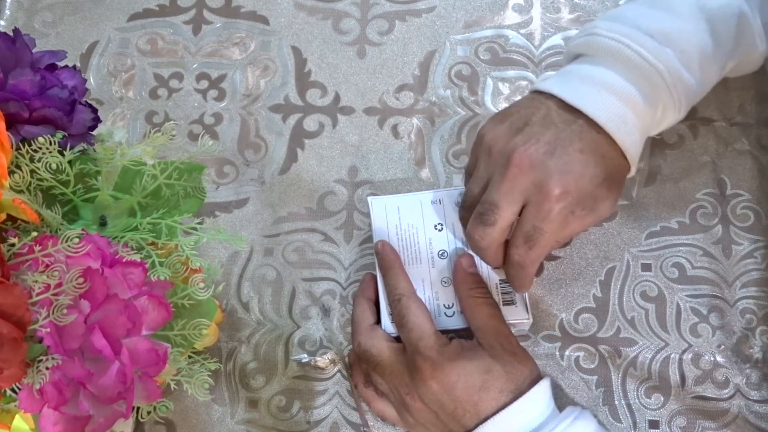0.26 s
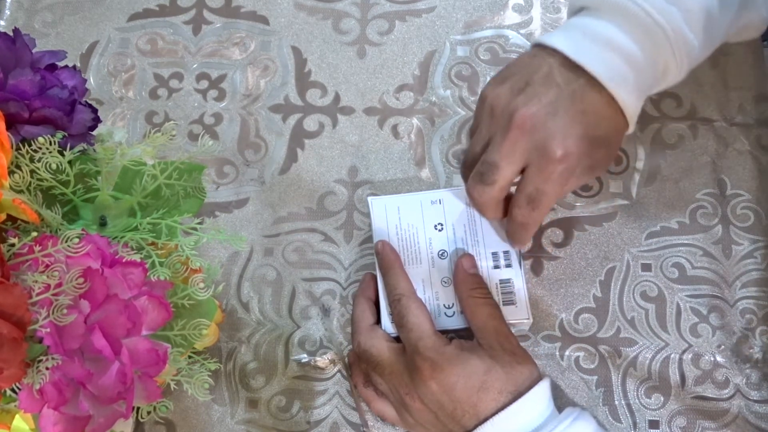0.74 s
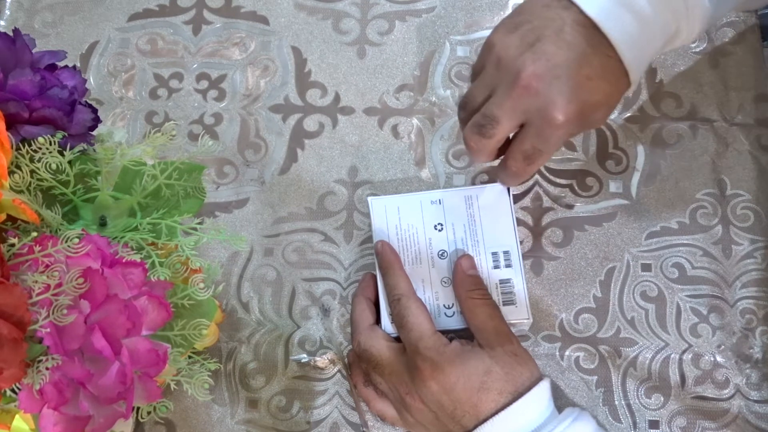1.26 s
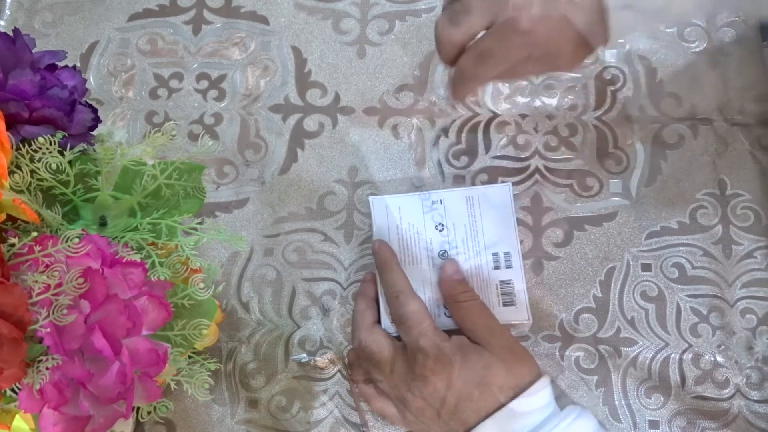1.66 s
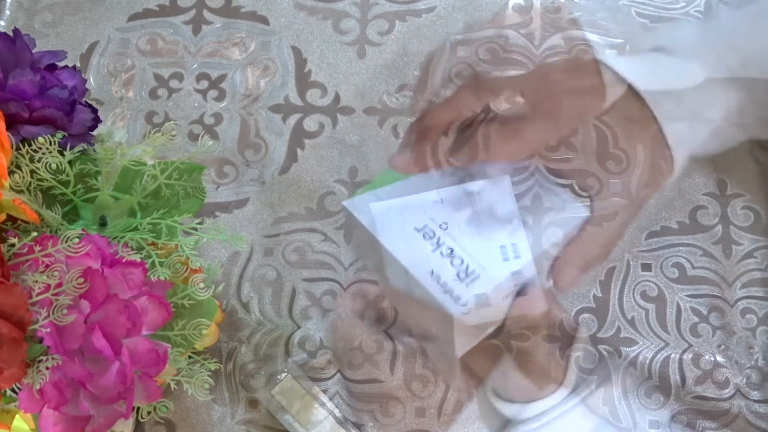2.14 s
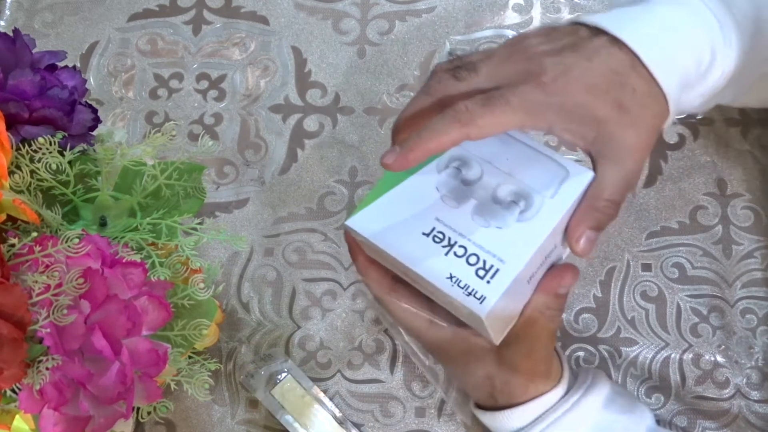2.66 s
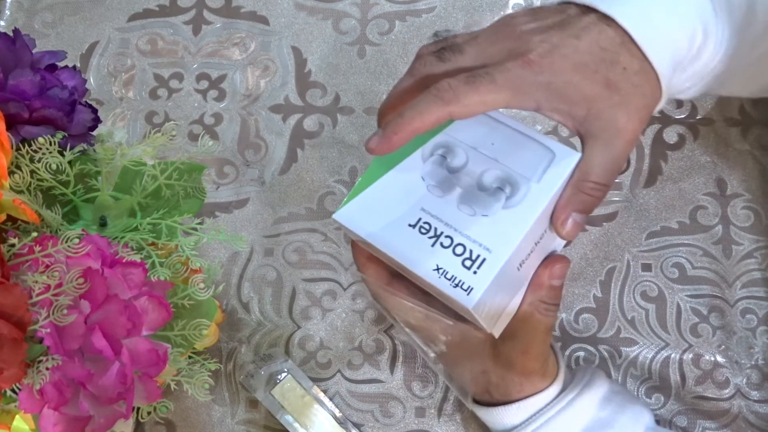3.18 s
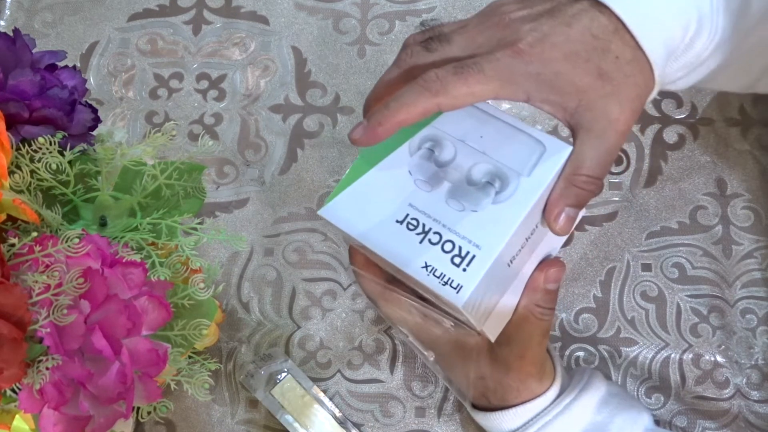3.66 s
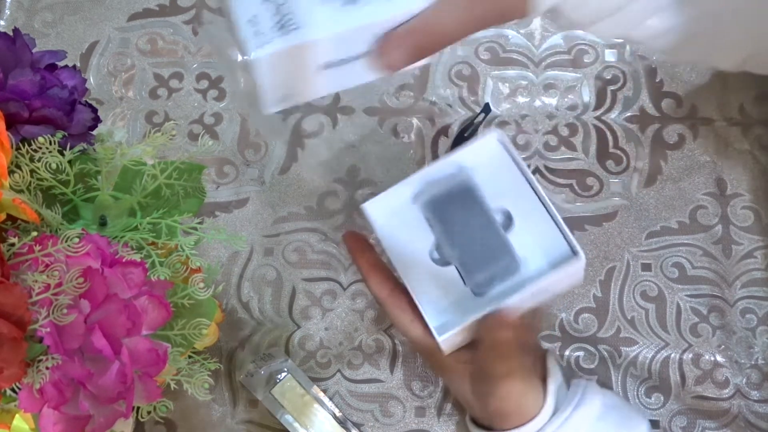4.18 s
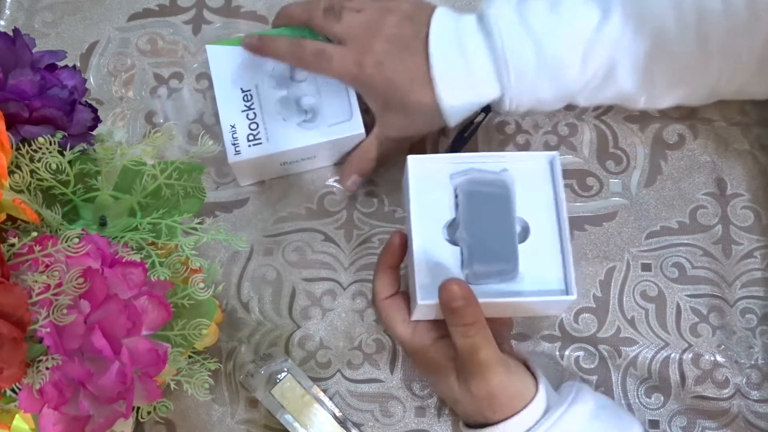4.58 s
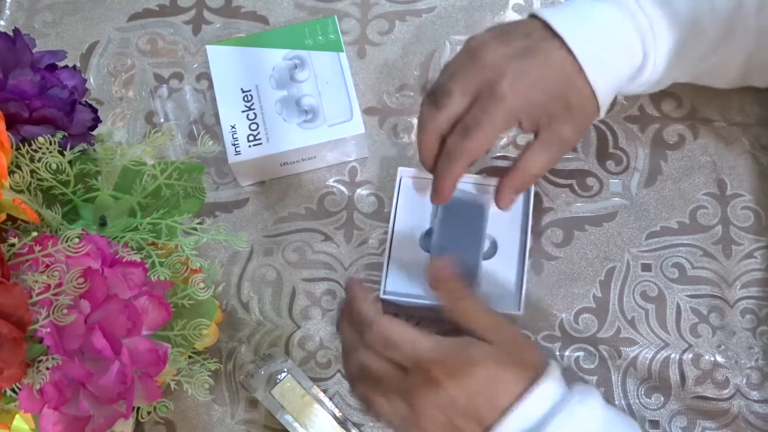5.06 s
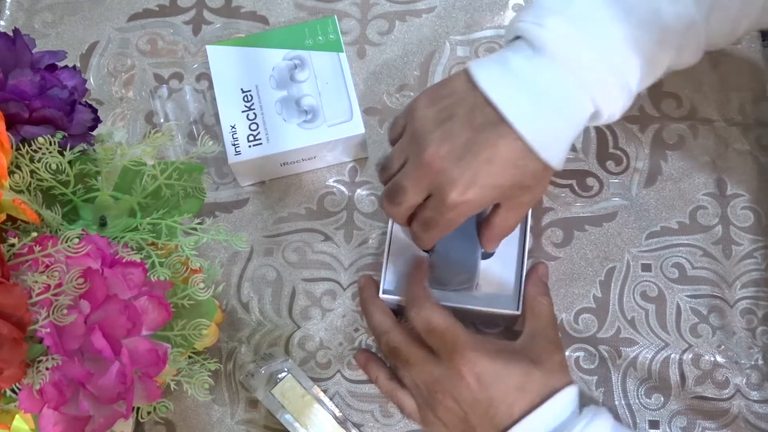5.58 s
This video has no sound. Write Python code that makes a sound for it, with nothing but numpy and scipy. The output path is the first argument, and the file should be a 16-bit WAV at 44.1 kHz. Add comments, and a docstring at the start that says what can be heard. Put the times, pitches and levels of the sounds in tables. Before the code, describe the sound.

Hands unwrap a small cardboard box with crisp plastic snaps, slide its lid free with a soft scrape and knock it against a table.

```python
"""Unpacking a small cardboard box.

Hands work at a plastic-covered table in a bare, ringing room. Sealing film ticks and rustles.
The tight lid sticks and slips upward, then pops free with a puff of air. The lid is dropped
and the tray knocked down; the table rings. A small motor throbs faintly in the background."""
import sys
import numpy as np
from scipy import signal
from scipy.fft import rfft, irfft
from scipy.io import wavfile

SR = 44100
rng = np.random.default_rng(int(sys.argv[2]) if len(sys.argv) > 2 else 0)


def store_wav(level_fs):
    """Save 16-bit WAV to argv[1]."""
    pcm = np.round(np.clip(np.atleast_2d(level_fs), -1, 1) * 32767)
    wavfile.write(sys.argv[1], SR, pcm.T.astype(np.int16))


N = 256662
TIME_S = np.arange(N) / SR
TOP_HZ = 11100

# Spectra of still air and of each contact. Each row: frequency in Hz, relative level in dB.
AIR_SPECTRUM = [(25, 4), (90, -5.5), (250, -6), (600, 0.5), (1100, -2.5), (1900, -9), (3200, -13),
                (4500, -18), (6500, -21), (11000, -15)]
SNAP_SPECTRUM = [(200, -26), (1500, -42), (3000, -37), (5500, -9), (8200, 0), (9500, -3.5), (11000, -8)]
CARD_SPECTRUM = [(100, -26), (500, -7), (1000, 4), (2000, 1), (3500, 2.5), (5000, 1.5), (11000, -17)]
HOLLOW_SPECTRUM = [(60, -35), (200, -20), (350, -13), (520, 3), (720, 0.5), (1050, -9), (1350, -12),
                   (2000, -10), (6000, -44)]
FILM_SPECTRUM = [(25, -21), (110, -12.5), (250, -8.5), (800, -3.5), (2500, -3), (5000, -1), (7600, 2.5),
                 (11000, -5.5)]
KNOCK_SPECTRUM = [(25, -55), (60, -47), (100, -23), (170, -23), (300, -6.5), (560, 0.5), (900, 3.5),
                  (1400, -3), (2100, -5.5), (2600, -12), (5500, -20), (7500, -24), (11000, -34.5)]
PAPER_SPECTRUM = [(30, -29), (500, -12), (1900, 3.5), (2500, -1), (3100, 4.5), (3800, -4), (5000, -4.5),
                  (8000, 1.5), (11000, -10.5)]
# Resonances of motor housing, whole box and lid walls. Each row: centre in Hz, width in Hz, gain in dB.
HOUSING_MODES = [(454, 185, 2.5), (622, 54, -3), (947, 41, 3), (1397, 230, 0.5), (2197, 120, -1),
                 (2590, 110, -15.5)]
BOX_MODES = [(229, 50, -2.5), (313, 163, 2.5)]
WALL_MODES = [(372, 176, 11), (815, 155, 7.5), (1010, 64, -34), (1420, 76, -0.5), (1830, 140, 1),
              (3020, 110, -2.5)]
# Film and nails catch on the box. Each row: start in seconds, film snap in dB, card click in dB,
# hollow thud in dB, panel resonance in Hz.
CATCHES = [(0.586, -20.5, -19.5, -47, 3400), (0.799, -14.5, -13, -10, 3020), (1.612, -6.5, -20, -20, 1310),
           (1.621, -10, -23, -35, 1230), (1.749, -5, -17, -20.5, 1260), (1.7667, -6, -23.5, -45, 4380),
           (1.810, -3, -21, -44, 3740), (2.014, -14, -30, -45, 4700), (2.027, -11, -26, -41, 5500),
           (2.0488, -4.5, -23, -46, 4730), (2.1813, -15, -16, -46, 1900), (2.184, -9, -13, -68, 4850),
           (2.239, -11.5, -26, -47, 4760), (2.258, -9.5, -18.5, -58, 2250), (3.749, -16.5, -20, -30, 1900),
           (4.094, -38, -39, -48, 3200), (4.268, -24.5, -37, -38, 4370), (4.2935, -16, -34, -56, 4470),
           (5.368, -29, -20, -28, 3230), (5.572, -35, -23, -37, 3300), (5.5994, -13, -20, -24, 3660)]
# Fingers or lid brush film and card. Each row: start, length and swell time in seconds, level in dB.
BRUSH_STROKES = [(.96, 0.22, 0.065, -61.5), (1.43, 0.057, 0.088, -60), (1.61, 0.13, 0.02, -54.5),
                 (1.77, 0.13, .03, -51), (1.95, .015, 0.027, -46.5), (2.06, .18, 0.028, -51),
                 (2.38, 0.016, 0.017, -65), (3.86, 0.049, .02, -58.5), (3.98, 0.34, .03, -66.5),
                 (4.33, 0.14, .02, -57.5), (4.497, 0.012, 0.0078, -34.5), (5.29, 0.038, 0.028, -48.5),
                 (5.45, .05, 0.036, -49), (5.62, 0.034, 0.034, -46.5)]
# The box is bumped, pops open or lands. Each row: start in seconds, energy in dB, bass gain in dB,
# hard-edge gain in dB, panel resonance in Hz, room send in dB.
BOX_KNOCKS = [(1.475, -23.5, 20.5, 1, 450, 2.5), (1.824, -20.5, 10, 17, 1300, 5.5),
              (3.75, -13, 1, 14, 940, -19), (4.477, 5.5, 6, 1, 1394, 8),
              (4.4934, -5.5, -4, 1.5, 1940, 11.5), (4.504, 8, 0.5, -3, 880, -8.5),
              (4.524, 6, 2.5, 0, 565, 1), (4.547, 8, 4.5, -21, 1440, 2), (4.847, 11, -6.5, 5, 1387, 1),
              (5.018, 8.5, 5, 4, 3720, 1.5), (5.0406, 10.5, 13, 12, 1800, -8),
              (5.0772, 4, 13, 20, 2470, -5)]
# Table resonances. Each row: frequency in Hz, relative energy in dB, 60 dB decay time in seconds.
TABLE_MODES = [(225, -11.5, 0.67), (327, -8, 0.76), (413, -13, 0.63), (570.6, -9.5, 0.28), (769, -8, 0.32),
               (859.5, -12.5, 0.35), (890, -19, 0.86), (1140, -8, 0.25), (1394, -14.5, 0.57),
               (1747, -19, 0.56), (1910, -12.5, 0.32), (2080, -24, .65)]
# Pulls on the lid; the last frees it. Each row: start and length in seconds, groan in dB, rub in dB.
LID_PULLS = [(2.735, 0.293, -53.5, -56), (3.108, 0.57, -53.5, -50.5), (3.742, 0.017, -51.5, -40.5)]
# The lid glides ahead. Each row: start, length and swell time in seconds, hiss level in dB.
LID_GLIDES = [(2.92, 0.033, 0.042, -48.5), (3.115, 0.049, 0.02, -49), (3.32, 0.084, 0.033, -49.5),
              (3.73, .04, 0.032, -48.5)]
# Reverberation. Each row: band centre in Hz, 60 dB decay time in seconds, level in dB,
# side relative to mid in dB.
ROOM_BANDS = [(100, 1.0, 3.5, -12.5), (300, 0.9, 3, -20), (714, 1, 3, -14), (1860, 1, -0.5, -9.5),
              (4650, 0.86, 0.5, -11), (10400, 0.69, -1, -9)]


def amp(db):
    """Decibels to gain."""
    return 10 ** (np.asarray(db) / 20)


def unit_rms(x):
    """Scale to rms 1."""
    return x / np.sqrt(np.mean(x ** 2))


def unit_energy(x):
    """Scale to energy 1."""
    return x / np.sqrt(np.sum(x ** 2))


def log_interp(hz, points_hz, values):
    """Interpolate on a log-frequency axis."""
    return np.interp(np.log(hz + 1), np.log(points_hz), values)


def response(spectrum, panel_hz=1000, panel_db=0, size=2048):
    """Minimum-phase impulse response of a spectrum, raised at one panel resonance; energy 1."""
    hz = np.fft.rfftfreq(size, 1 / SR)
    peak_db = panel_db / (1 + ((hz / panel_hz - 1) / 0.088) ** 2)
    cepstrum = irfft(np.log(amp(log_interp(hz, *np.transpose(spectrum)) + peak_db)))
    cepstrum[1:size // 2] *= 2
    cepstrum[size // 2 + 1:] = 0
    return unit_energy(irfft(np.exp(rfft(cepstrum))))


def convolve(x, impulse):
    """Convolve, keeping the length."""
    return signal.fftconvolve(x, impulse)[:len(x)]


def resonate(x, modes):
    """Parallel resonators."""
    return sum(amp(db) * signal.lfilter(*signal.iirpeak(hz, hz / width_hz, fs=SR), x)
               for hz, width_hz, db in modes)


def add(track, start_s, x):
    """Mix x into the track."""
    i = int(start_s * SR)
    track[i:i + len(x)] += x[:N - i]


def wander(rate_hz):
    """Random drift, spread near 1."""
    knots = rng.standard_normal(int(N / SR * rate_hz) + 2)
    return np.interp(TIME_S * rate_hz, np.arange(len(knots)), knots)


def grains(rate_hz, spread_db):
    """Dense tiny catches of uneven size."""
    impulses = (rng.random(N) < rate_hz / SR) * rng.standard_normal(N)
    return unit_rms(impulses * amp(spread_db * np.minimum(rng.exponential(size=N), 4)))


def disperse(x, linger_s, stages):
    """Bending waves scatter: all-pass stages delay some pitches, low ones most."""
    place = (np.arange(stages) + rng.random(stages)) / stages
    poles = np.exp(2j * np.pi * TOP_HZ * place ** 2 / SR - (0.5 + place) / (linger_s * SR))
    denominator = np.column_stack([np.ones(stages), -2 * poles.real, np.abs(poles) ** 2])
    return signal.sosfilt(np.hstack([denominator[:, ::-1], denominator]), x)


def stroke(start_s, length_s, attack_s, release_s):
    """Envelope of one hand movement: swells up to its start, holds, fades."""
    since_s = TIME_S - start_s
    return np.exp(np.minimum(since_s, 0) / attack_s - np.maximum(since_s - length_s, 0) / release_s)


def strokes(rows, release_s):
    """Envelope of several movements; powers add."""
    return np.sqrt(sum((amp(db) * stroke(start_s, length_s, swell_s, release_s)) ** 2
                       for start_s, length_s, swell_s, db in rows))


def stereo_noise(side_gain):
    """Partly correlated white noise, left and right."""
    mid, side = rng.standard_normal((2, N))
    return mid + side_gain * side, mid - side_gain * side


def still_air(level_db):
    """Steady, dull room noise."""
    air = response(AIR_SPECTRUM)
    return amp(level_db) * np.array([unit_rms(convolve(x, air)) for x in stereo_noise(0.95)])


def motor(whirr_db, throb_db):
    """The housing whirrs, and throbs once a turn."""
    turn_hz, tone_hz, sharpness, uneven_db = 25.1, 476, 2.2, 1.7
    whirr = np.array([resonate(resonate(x, HOUSING_MODES), HOUSING_MODES) for x in stereo_noise(0.83)])
    pulses = np.exp(sharpness * np.cos(2 * np.pi * turn_hz * (TIME_S - 0.037)))
    pulses *= amp(uneven_db * wander(turn_hz))
    tone = np.sin(2 * np.pi * tone_hz * TIME_S + 1.15 * wander(turn_hz))
    return amp(whirr_db) * unit_rms(whirr) + amp(throb_db) * unit_rms(pulses * tone)


def film_ticks():
    """Each catch snaps the film, clicks a card panel and thuds the air in the box."""
    out = np.zeros(N)
    snap, hollow = response(SNAP_SPECTRUM), response(HOLLOW_SPECTRUM)
    for start_s, snap_db, card_db, hollow_db, panel_hz in CATCHES:
        card = response(CARD_SPECTRUM, panel_hz, panel_db=10)
        add(out, start_s, amp(snap_db) * disperse(snap, linger_s=0.0004, stages=6))
        add(out, start_s, amp(card_db) * disperse(card, linger_s=0.0016, stages=10))
        add(out, start_s, amp(hollow_db) * disperse(hollow, linger_s=0.0018, stages=8))
    return out


def film_rustle():
    """Skin drags over film in a fine, uneven crackle."""
    pressure = strokes(BRUSH_STROKES, release_s=0.019) * amp(0.94 * wander(60))
    return pressure * convolve(grains(rate_hz=4000, spread_db=2), response(FILM_SPECTRUM))


def box_knocks():
    """Flat landings are bassy, corners hard. Returns direct sound and room send."""
    direct, send = np.zeros(N), np.zeros(N)
    hz, db = np.transpose(KNOCK_SPECTRUM)
    bass_shelf = log_interp(hz, [330, 650], [1, 0])
    edge_shelf = log_interp(hz, [1500, 3200], [0, 1])
    for start_s, energy_db, bass_db, edge_db, panel_hz, send_db in BOX_KNOCKS:
        spectrum = np.column_stack([hz, db + bass_db * bass_shelf + edge_db * edge_shelf])
        impact = response(spectrum, panel_hz, panel_db=9)
        hit = amp(energy_db) * disperse(impact, linger_s=0.0029, stages=14)
        add(direct, start_s, hit)
        add(send, start_s, hit * amp(send_db))
    return direct, send


def table_ring(knocks, gain_db):
    """The table top rings on after each knock."""
    t = TIME_S[:SR]
    ring = sum(amp(db) * unit_energy(np.sin(2 * np.pi * hz * t) * np.exp(-np.log(1000) * t / t60_s))
               for hz, db, t60_s in TABLE_MODES)
    return amp(gain_db) * convolve(knocks, ring)


def pull_gains():
    """In each pull the groan eases as the lid moves; the rub grows with speed."""
    groan_sag_db_per_s, rub_rise_db_per_s = 11, 1.5
    groan, rub = np.zeros(N), np.zeros(N)
    for start_s, length_s, groan_db, rub_db in LID_PULLS:
        force = stroke(start_s, length_s, attack_s=0.02, release_s=0.0096)
        elapsed_s = np.clip(TIME_S - start_s, 0, length_s)
        groan += force * amp(groan_db - groan_sag_db_per_s * elapsed_s)
        rub += force * amp(rub_db + rub_rise_db_per_s * elapsed_s)
    return groan, rub


def lid_slide(judder_db, paper_db):
    """The lid sticks and slips on the tray: the box groans, walls resound, paper hisses."""
    first_slip_hz, rise_hz_per_s = 232.6, 250
    slip_hz = first_slip_hz + rise_hz_per_s * np.maximum(TIME_S - LID_PULLS[0][0], 0)
    slip_count = np.cumsum(slip_hz * np.exp(0.11 * wander(250))) / SR
    judder = np.diff(np.floor(slip_count), prepend=0) * amp(1.8 * wander(200))
    friction = grains(rate_hz=2000, spread_db=3.5) + amp(judder_db) * unit_rms(judder)
    groan = unit_rms(resonate(resonate(friction, BOX_MODES), BOX_MODES))
    # Small walls radiate little bass; soft card damps the treble.
    wall_band = signal.butter(2, [260, 3900], "band", fs=SR, output="sos")
    rub = unit_rms(signal.sosfilt(wall_band, resonate(friction, WALL_MODES)))
    hiss = convolve(grains(rate_hz=5200, spread_db=-0.5), response(PAPER_SPECTRUM))
    groan_gain, rub_gain = pull_gains()
    hiss_gain = np.hypot(strokes(LID_GLIDES, release_s=0.014), amp(paper_db) * rub_gain)
    return (groan * groan_gain + rub * rub_gain + hiss * hiss_gain) * amp(1.6 * wander(35.16))


def lid_puff(start_s, energy_db, pitch_hz, fade_s):
    """Air rushes under the freed lid: a soft, low puff."""
    out, t = np.zeros(N), TIME_S[:SR // 4]
    puff = np.sin(2 * np.pi * pitch_hz * t) * t * np.exp(-t / fade_s)
    add(out, start_s, amp(energy_db) * unit_energy(puff))
    return out


def room(x, echo_s, echo_db, early_db, early_s):
    """One wall echo, dense early reflections and a long tail, nearly alike in both ears."""
    t, hz = TIME_S[:SR], np.fft.rfftfreq(SR, 1 / SR)
    centres_hz = [row[0] for row in ROOM_BANDS]
    noise_spectrum = rfft(rng.standard_normal((2, SR)))
    build_up = np.clip((t - 0.0025) / 0.0089, 0, 1) * (1 + amp(early_db) * np.exp(-t / early_s))
    mid, side = np.zeros(SR), np.zeros(SR)
    for weights, (_, t60_s, level_db, side_db) in zip(np.eye(len(ROOM_BANDS)), ROOM_BANDS):
        decay = unit_energy(build_up * np.exp(-np.log(1000) * t / t60_s))
        band = irfft(noise_spectrum * log_interp(hz, centres_hz, weights), SR) * decay * amp(level_db)
        mid += band[0]
        side += band[1] * amp(side_db)
    mid[int(echo_s * SR)] += amp(echo_db)
    return np.array([convolve(x, mid + side), convolve(x, mid - side)])


def scene():
    """Hands and table heard from just above, in the room."""
    lid = lid_slide(judder_db=-10.5, paper_db=-10)
    lid += lid_puff(start_s=3.745, energy_db=-30, pitch_hz=115, fade_s=0.0046)
    hands = film_ticks() + film_rustle() + lid
    knocks, knock_send = box_knocks()
    table = knocks + table_ring(knocks, gain_db=-12.5)
    direct = hands * amp([[-0.7], [0.7]]) + table * amp([[0.3], [-0.3]])  # left, right
    reverb = room(hands + knock_send, echo_s=0.0084, echo_db=-14.5, early_db=2, early_s=0.061)
    return direct + reverb + still_air(level_db=-65) + motor(whirr_db=-61.5, throb_db=-66)


def record(dry):
    """The microphone path rounds peaks, sheds rumble and cuts the top steeply."""
    ceiling, rumble_hz = 0.8, 45
    rounded = ceiling * np.tanh(dry / ceiling)
    highpass = signal.butter(2, rumble_hz, "high", fs=SR, output="sos")
    lowpass = signal.ellip(12, 0.2, 80, TOP_HZ, fs=SR, output="sos")
    return signal.sosfilt(lowpass, signal.sosfilt(highpass, rounded))


dry = scene()
out = record(dry)
store_wav(out)
```